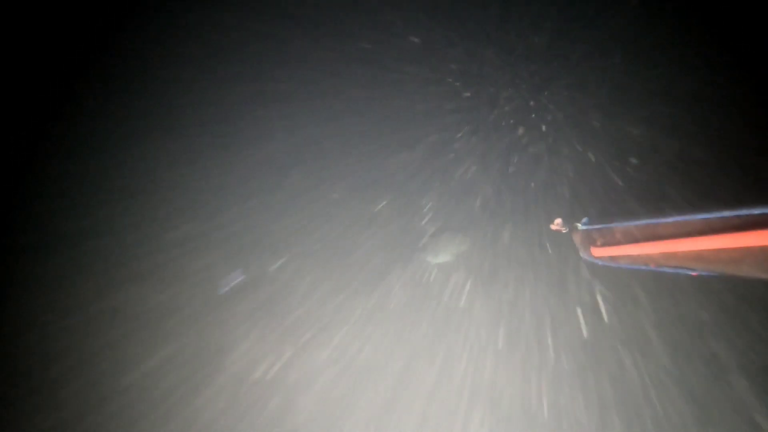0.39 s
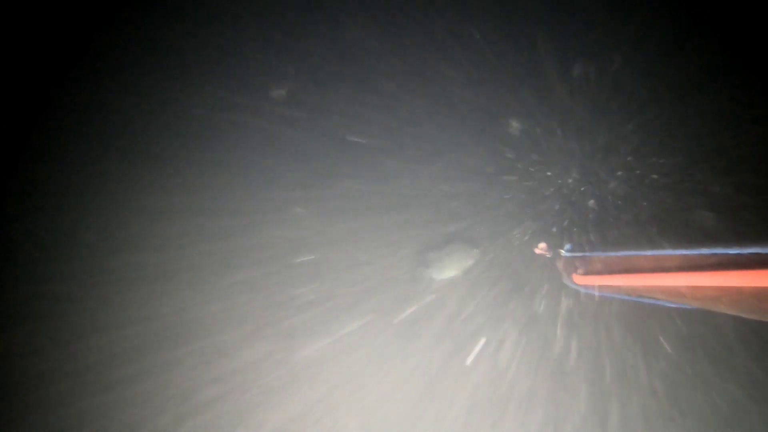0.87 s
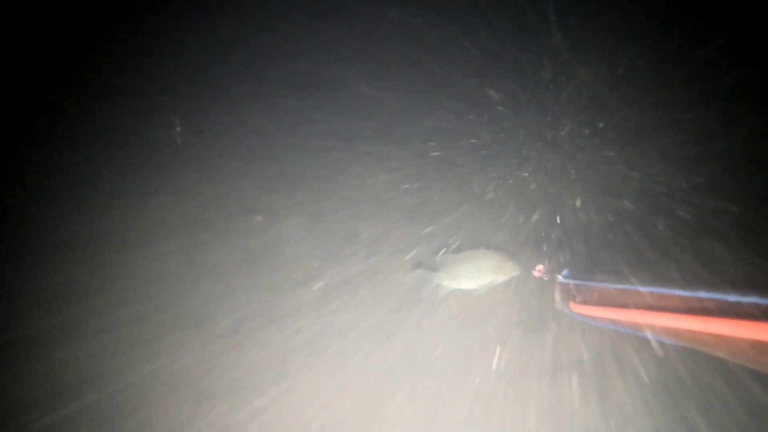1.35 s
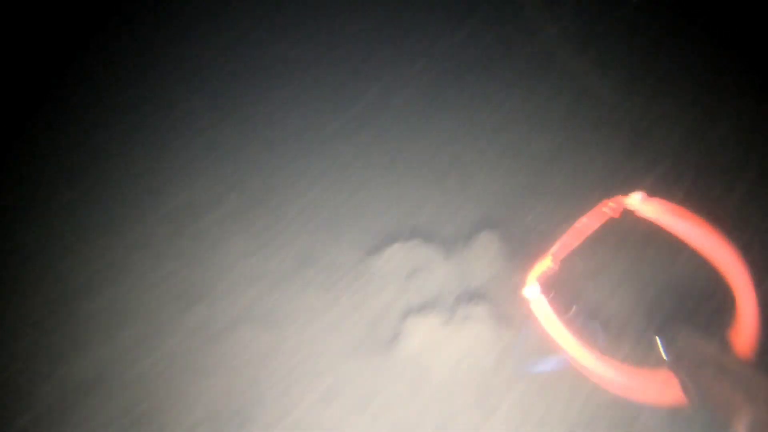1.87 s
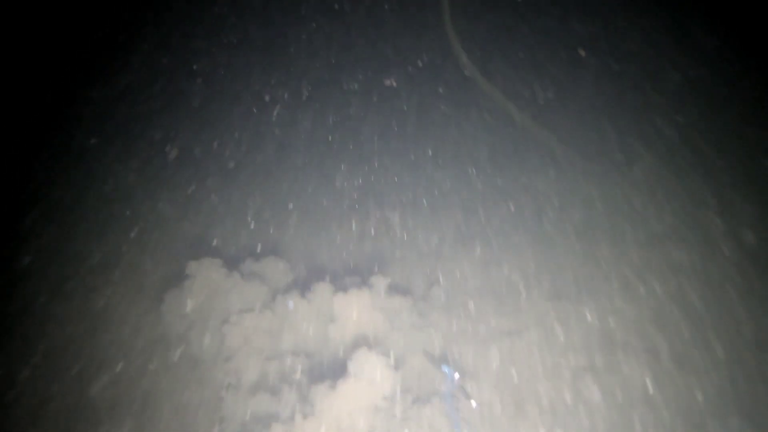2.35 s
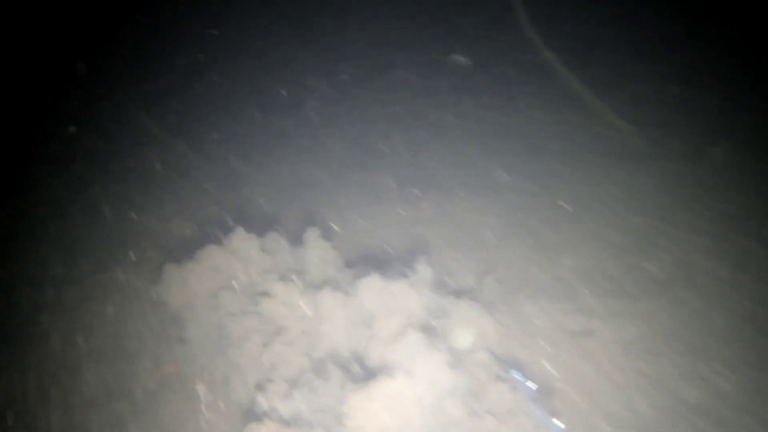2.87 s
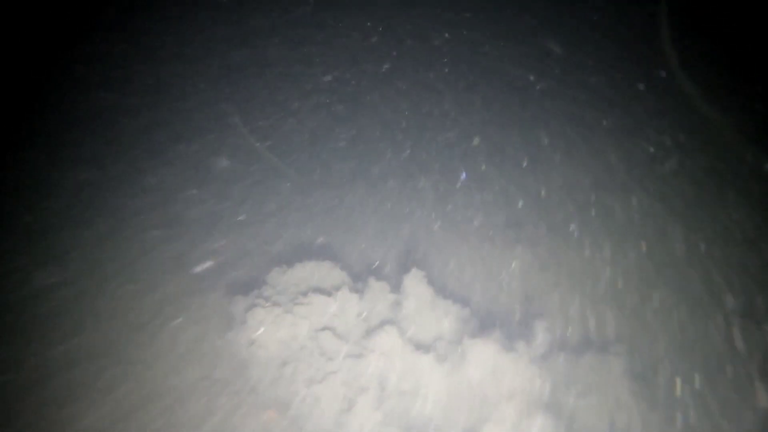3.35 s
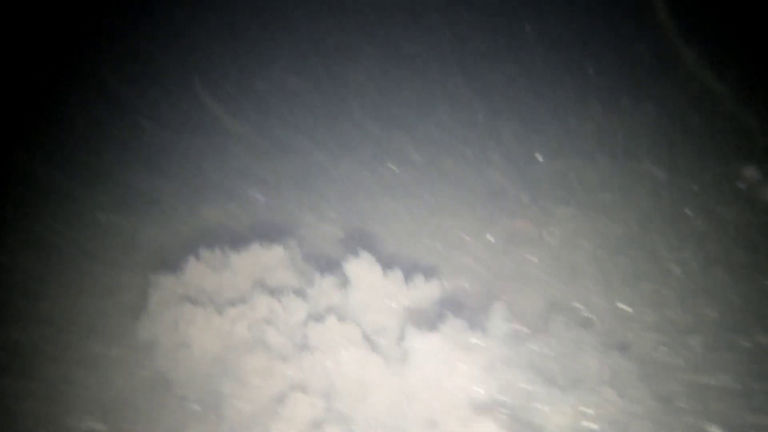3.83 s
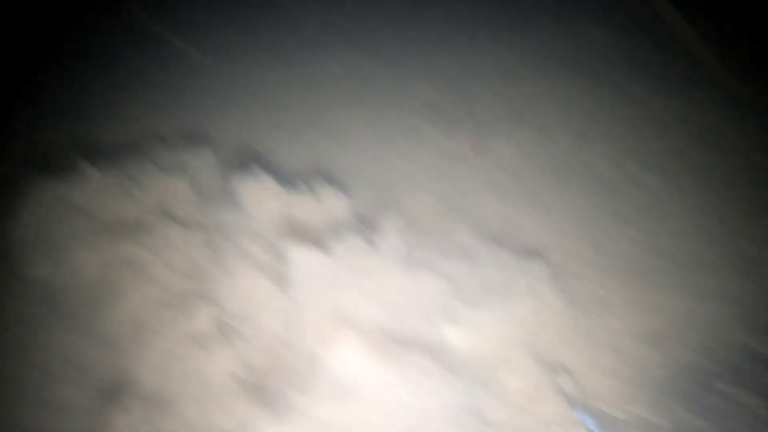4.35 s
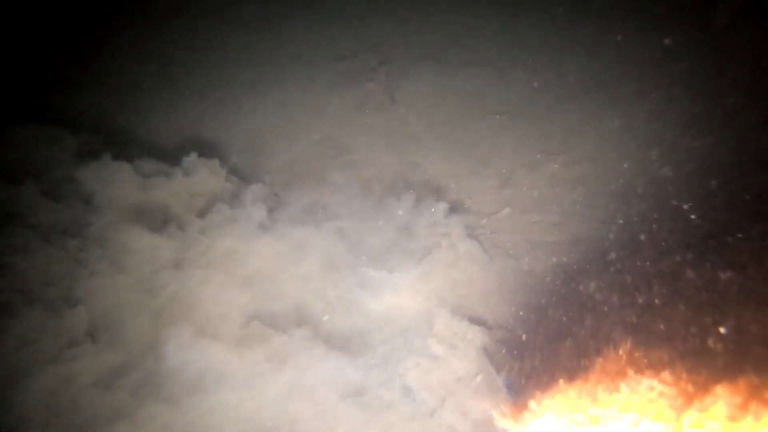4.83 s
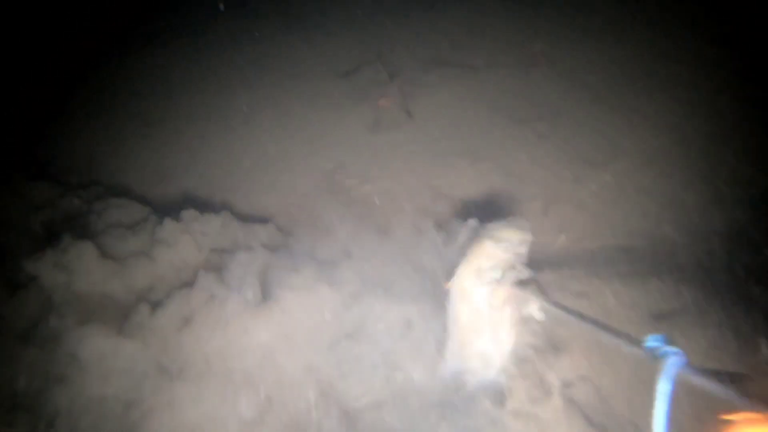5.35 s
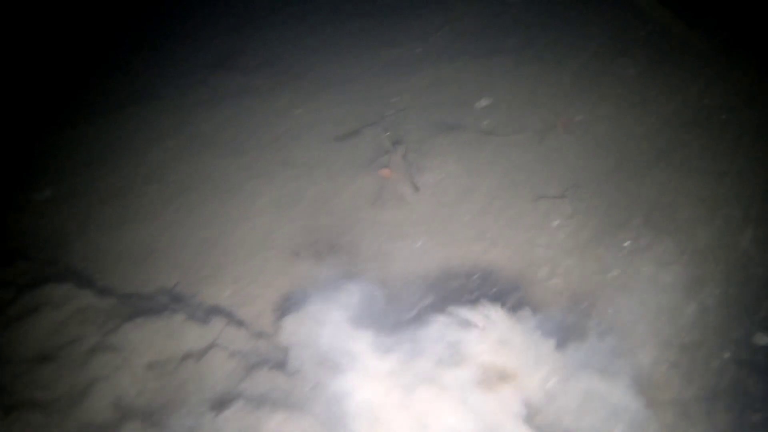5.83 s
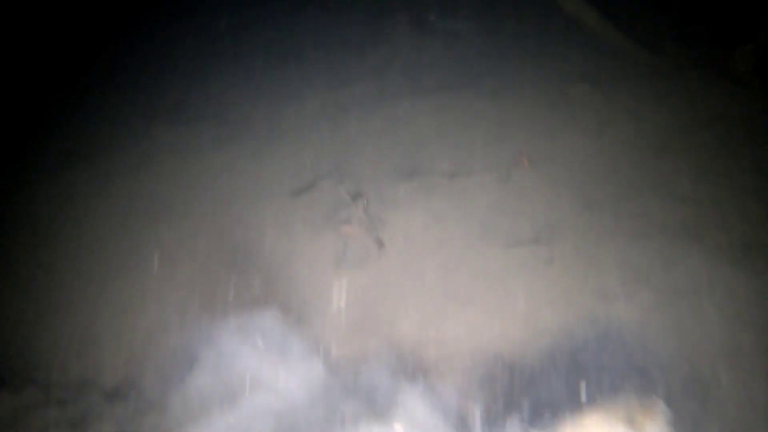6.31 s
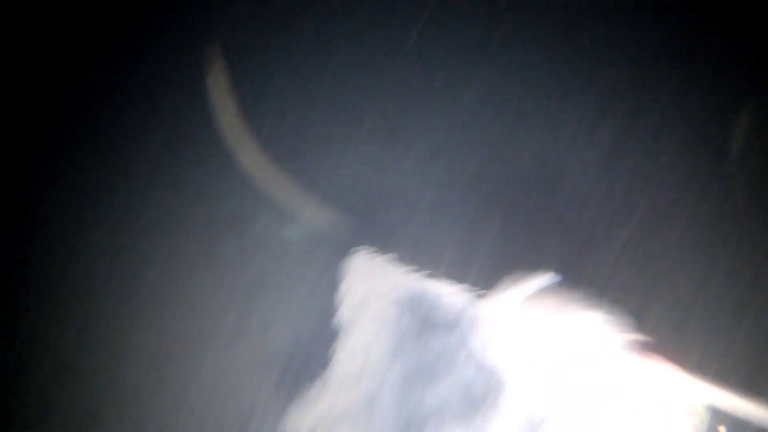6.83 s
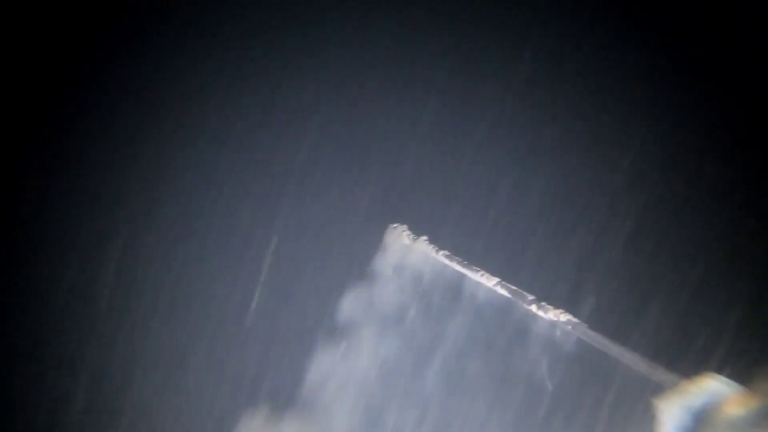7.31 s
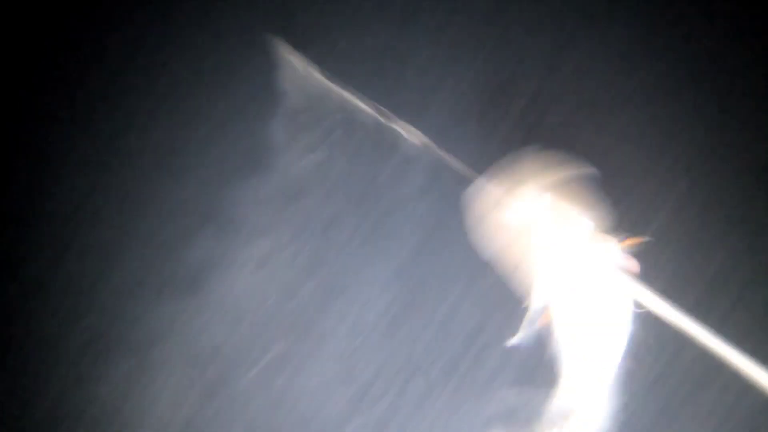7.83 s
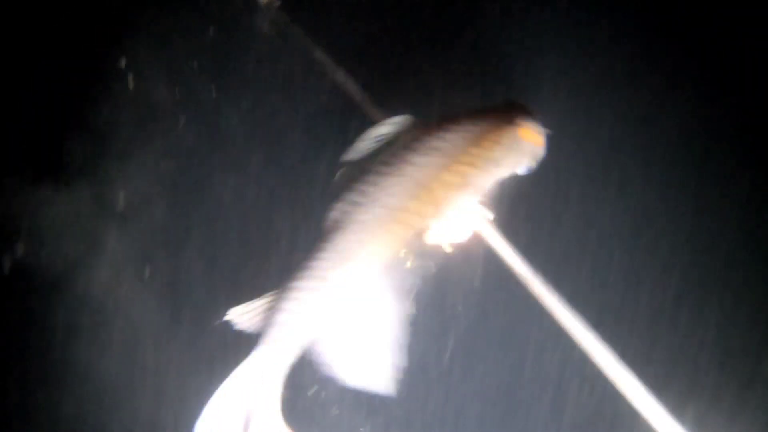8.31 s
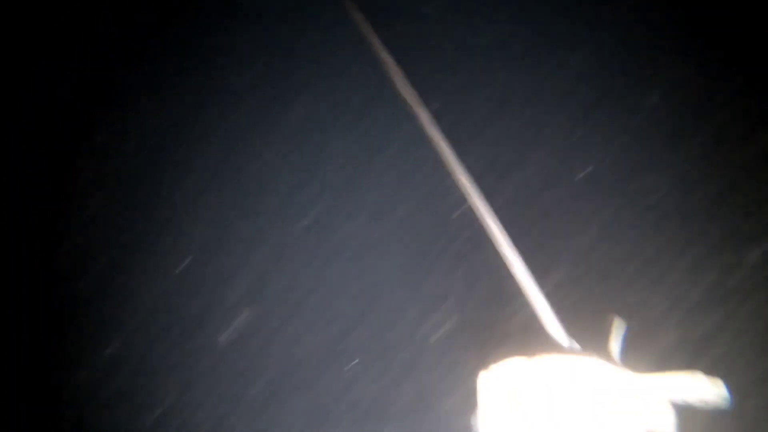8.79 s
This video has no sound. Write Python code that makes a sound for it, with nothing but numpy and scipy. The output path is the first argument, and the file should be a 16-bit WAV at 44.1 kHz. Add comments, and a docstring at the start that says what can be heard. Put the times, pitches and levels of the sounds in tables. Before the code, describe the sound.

Underwater sound picked up inside a hard plastic camera housing, muffled, close and boxy. For the first second there is low water rumble, faint rubbing, a short deep hum and small ticks. At about 1.1 s a speargun fires: a loud clipped crack and thump, a brief tearing rasp, rough steel ring and low barrel resonance dying quickly. From 1.3 to 3.7 s, dry clicks and light hollow knocks are scattered over quiet crackle, with a few tiny bubble blips. Around 4.0 s two stronger hollow knocks and brief low hums sound. From 4.6 to 5.5 s come dense muffled thumps, scraping and hissing grit. More bumps fall near 6.4 s, a sharp clack at 7.1 s, and a thud at 7.4 s. Deep drags and bumps surge around 8.0 to 8.4 s, then from 8.6 s loud, plopping, gurgling bubbles crowd in with a splashy hiss until the end.

```python
"""A speargun fires under water beside a camera in a hard plastic housing; line, spear and fish are hauled in.
Ticks, thumps, rubbing and the tearing of spear and bands excite the resonant modes of the housing. Gun barrel
and steel shaft add decaying modes, further knocks ring a common set near 630 Hz; dragging adds held deep hums.
Moving water rocks the housing in narrow bands of deep noise, and bubbles ring as sliding sines, a few at first,
then thickly near the end."""
import sys
import numpy as np
from scipy import signal
from scipy.fft import next_fast_len
from scipy.io import wavfile

SR = 44100
rng = np.random.default_rng(int(sys.argv[2]) if len(sys.argv) > 2 else 0)


def makeup_ratio(level_db):
    """Linear amplitude ratio for a level in decibels (20 dB per factor of ten)."""
    decades = np.asarray(level_db, float) / 20
    return 10 ** decades


def output_pcm(signal):
    """Save a mono or channel-first signal as 16-bit PCM at the path in sys.argv[1].

    Samples are clipped to [-1, 1] before scaling.
    """
    pcm = np.clip(np.atleast_2d(signal).T, -1, 1) * 32767
    wavfile.write(sys.argv[1], SR, np.round(pcm).astype(np.int16))


N = 393813


def level(x, db):
    """Normalization: scale a signal to a given rms level."""
    return x * makeup_ratio(db) / np.sqrt(np.mean(x ** 2))


def curves(table):
    """Linear interpolation: join each column after the time by straight lines, one value a sample."""
    s, *columns = np.transpose(table)
    return [np.interp(np.arange(N) / SR, s, column) for column in columns]


def ring(x, hz, t60):
    """Damped resonance: a complex one-pole filter turns x into a decaying rotating pointer."""
    pole = np.exp((2j * np.pi * hz - np.log(1000) / t60) / SR)
    return signal.lfilter([1], [1, -pole], x)


def band(hz, width_hz):
    """Narrow-band noise: filtered white noise of rms 1, made a rotating pointer by the Hilbert transform."""
    edges_hz = [hz - width_hz / 2, hz + width_hz / 2]
    sos = signal.butter(2, edges_hz, "bandpass", fs=SR, output="sos")
    noise = level(signal.sosfilt(sos, rng.standard_normal(N)), 0)
    return signal.hilbert(noise, next_fast_len(N))[:N]


def spikes(s, gain, push_ms):
    """Impulsive excitation: blows at times s, where a softer contact pushes longer."""
    x = np.zeros(N)
    np.add.at(x, np.clip((np.asarray(s) * SR).astype(int), 0, N - 1), gain)
    push = np.hanning(max(int(push_ms * SR / 1000), 1) + 2)
    return np.convolve(x, push / push.sum())[:N]


def grit(per_s, spread_db, hiss):
    """Granular noise: random clicks, a few much larger than the rest, over a smooth hiss; rms 1."""
    size = makeup_ratio(spread_db * np.minimum(rng.exponential(size=N), 4))
    size = size * (rng.random(N) < per_s / SR)
    clicks = level(size * rng.standard_normal(N), 0)
    return level(clicks + hiss * rng.standard_normal(N), 0)


def chatter(x, tail_ms, tail_db):
    """Repeated micro-impacts: loose parts add an exponentially fading noise after each blow."""
    fade = signal.lfilter([1], [1, -np.exp(-1000 / (tail_ms * SR))], x)
    return x + makeup_ratio(tail_db) * fade * rng.standard_normal(N)


def burst(s, rise_s, hold_s, t60):
    """Attack and exponential decay: a gain that swells from s, holds, then dies away."""
    t = np.arange(N) / SR - s
    return np.clip(t / rise_s, 0, 1) * makeup_ratio(-60 * np.maximum(t - rise_s - hold_s, 0) / t60)


def gusts(per_s, spread_db):
    """Random modulation: a factor that wanders between random decibel values."""
    count = int(N / SR * per_s) + 2
    return makeup_ratio(spread_db * np.interp(np.arange(N) / SR * per_s, np.arange(count), rng.standard_normal(count)))


def lean(z, hz):
    """Level and phase differences: a vibration of this pitch as the left and right microphones feel it."""
    # how left differs from right: (frequency [Hz], louder [dB], earlier [rad])
    sides = [(30, 6, 0.27), (92.1, 3.5, 0.29), (205, -1, 0.85), (630, 6.5, 1.78), (1060, -11.5, 2),
             (1800, -4, 0.73), (2850, 4, 0.12), (5430, 1, 0.81), (12300, 16.5, 1.2)]
    f, db, lead = np.transpose(sides)
    # each side takes half the difference, with opposite signs
    half = np.array([[1], [-1]]) / 2
    db = np.interp(np.log(hz), np.log(f), db) * half
    lead = np.interp(np.log(hz), np.log(f), lead) * half
    return (makeup_ratio(db) * np.exp(1j * lead) * z).imag


def water():
    """Low-frequency flow excitation: housing sways near one deep pitch, eddies wallow above, shoves swell both."""
    sway_hz, wallow_hz = 29.77, 72
    # steady motion: (time [s], sway level [dB], wallow level [dB])
    motion = [(0.0, -37, -59.5), (0.3, -42.5, -42.5), (0.9, -45, -72.5), (1.3, -40, -52), (1.6, -36, -71),
              (3.2, -38.5, -53), (3.73, -37, -32), (3.85, -28, -81), (4.05, -29.5, -40), (4.3, -34.5, -59),
              (4.9, -33.5, -30.5), (5.32, -38.5, -50.5), (5.6, -30.5, -45), (6.89, -37, -37),
              (7.54, -28.5, -37.5), (7.95, -39, -55.5), (8.32, -36, -35), (8.68, -28.5, -35),
              (8.93, -39.5, -27.5)]
    # hard shoves that set the water surging: (time [s], sway level [dB], wallow level [dB])
    surges = [(1.081, -36.5, -14), (5.468, -39, -21.5), (8.04, -20, -19.5)]
    sway, wallow = makeup_ratio(np.array(curves(motion)))
    for s, sway_db, wallow_db in surges:
        swell = burst(s, rise_s=0.0046, hold_s=0, t60=0.19)
        sway = sway + makeup_ratio(sway_db) * swell
        wallow = wallow + makeup_ratio(wallow_db) * swell
    swaying = sway * lean(band(sway_hz, width_hz=8.96), sway_hz)
    return swaying + wallow * lean(band(wallow_hz, width_hz=40), wallow_hz)


def hums():
    """Friction-driven vibration: the largest panel holds a slightly wavering deep tone during each drag."""
    # drags: (time [s], level [dB], frequency [Hz], hold [s])
    drags = [(0.206, -38, 186, 0.12), (1.248, -33.5, 92.7, 0.023), (4.042, -32.5, 195.6, 0.026),
             (4.128, -31, 205, 0.068), (4.268, -38.5, 199, 0.026), (8.048, -23, 196, 0.016),
             (8.054, -15.5, 72, 0.011), (8.353, -20.5, 197, 0.037)]
    out = np.zeros((2, N))
    for s, db, hz, hold in drags:
        gain = makeup_ratio(db) * burst(s, rise_s=0.017, hold_s=hold, t60=0.18) * gusts(per_s=65, spread_db=2.0)
        # here the wandering factor bends the pitch
        phase = 2 * np.pi * np.cumsum(hz * gusts(per_s=37, spread_db=0.64)) / SR
        out += lean(gain * np.exp(1j * phase), hz)
    return out


def bubbles():
    """Bubble resonance: each is a decaying, wavering sine of sliding pitch; tiny ones come in clouds."""
    # single bubbles: (time [s], level [dB], starting frequency [Hz], t60 [s])
    singles = [(1.66, -37.5, 3100, 0.055), (2.772, -41, 1810, 0.036), (2.812, -39, 1800, 0.041),
               (2.848, -40.5, 1520, 0.03), (3.619, -35.5, 1780, 0.022), (3.806, -38.5, 1470, 0.046),
               (3.846, -32, 1750, 0.018), (7.011, -32, 1444, 0.15), (8.614, -24.5, 2100, 0.035),
               (8.62, -20.5, 904, 0.14), (8.627, -19, 2850, 0.013), (8.636, -15, 1340, 0.033),
               (8.642, -12.5, 444, 0.19), (8.645, -7.5, 810, 0.095), (8.673, -14.5, 2764, 0.019),
               (8.688, -7.5, 1310, 0.019), (8.692, -11, 733, 0.18), (8.716, -14, 1875, 0.046),
               (8.738, -25, 1800, 0.029), (8.738, -14, 822, 0.2), (8.755, -13.5, 860, 0.053),
               (8.773, -20, 1815, 0.028), (8.799, -2.5, 600, 0.17), (8.812, -31, 2000, 0.03),
               (8.812, -30, 3030, 0.015), (8.84, -33, 2020, 0.032), (8.856, -10, 858, 0.11),
               (8.857, -39, 2980, 0.013), (8.886, -33, 3240, 0.016)]
    # clouds of tiny bubbles: (start [s], end [s], loudest level [dB])
    clouds = [(6.845, 7.102, -36.5), (8.417, 8.592, -31), (8.61, 8.928, -16.5)]
    per_s, lowest_hz = 500, 600  # of the clouds
    still_hz, slide_octaves = 950, 0.2  # lower bubbles slide up, higher ones down, per octave away
    swarm = []
    for start, end, top_db in clouds:
        for when, faint, small in rng.random((int(per_s * (end - start)), 3)):
            # smaller bubbles are higher, fainter and shorter
            swarm.append((start + when * (end - start), top_db - 12 * faint - 14 * small,
                          lowest_hz * 2 ** (2.6 * small), 0.035 * 2 ** (-2.5 * small)))
    out, t = np.zeros((2, N + SR)), np.arange(SR // 3) / SR
    for s, db, hz, t60 in [*singles, *swarm]:
        rise_ms = 0.5 * 2 ** (-db / 29)  # 29 dB fainter starts twice as slowly
        # the slide eases off, and neighbours jostle the pitch
        octaves = slide_octaves * np.log2(still_hz / hz) * (1 - np.exp(-t / 0.039))
        octaves = octaves + 0.03 * np.interp(t * 150, np.arange(64), rng.standard_normal(64))
        phase = 2 * np.pi * np.cumsum(hz * 2 ** octaves) / SR
        waver_db = 3 * np.interp(t * 180, np.arange(64), rng.standard_normal(64))
        fade = makeup_ratio(db + waver_db - 60 * (t / t60) ** 1.55) * (1 - np.exp(-1000 * t / rise_ms))
        first = int(s * SR)
        out[:, first:first + len(t)] += lean(fade * np.exp(1j * phase), hz)
    return out[:, :N]


def knocks():
    """Modal excitation: further knocks, each rattling briefly and ringing a common set of modes in its own mix."""
    # modes rung by the further knocks: (frequency [Hz], level [dB], t60 [s])
    modes = [(634.5, 0, 0.067), (714, -13, 0.077), (870, -12.5, 0.09)]
    # the knocks: (time [s], level [dB])
    strikes = [(1.315, -36), (1.335, -30.5), (2.302, -35.5), (2.316, -28.5), (2.415, -43), (2.433, -32),
               (2.467, -32.5), (2.513, -47), (2.583, -30), (2.866, -40), (2.885, -39.5), (3.619, -33.5),
               (4.009, -11), (4.042, -12.5), (4.137, -29.5)]
    s, db = np.transpose(strikes)
    share = makeup_ratio(2 * rng.standard_normal((len(s), len(modes))))
    body = np.zeros((2, N))
    for k, (hz, mode_db, t60) in enumerate(modes):
        blows = chatter(spikes(s, makeup_ratio(db) * share[:, k], push_ms=0.55), tail_ms=6.1, tail_db=-20)
        body += makeup_ratio(mode_db) * lean(ring(blows, hz, t60), hz)
    return signal.sosfilt(signal.butter(2, 450, "highpass", fs=SR, output="sos"), body)


def rushes():
    """Granular noise: dense, hissing grit swells over door and latch, the last a splash among the bubbles."""
    # swells, before the zone offsets: (time [s], level [dB], swell [s], hold [s])
    swells = [(4.646, -70, 0.13, 0.089), (5.334, -74, 0.17, 0.3), (7.71, -83.5, 0.068, 0.42),
              (8.592, -75.5, .03, 0.16)]
    gain = sum(makeup_ratio(db) * burst(s, swell, hold, t60=0.61) for s, db, swell, hold in swells)
    return gain * gusts(per_s=25, spread_db=2.5) * grit(per_s=1000, spread_db=3.5, hiss=0.6)


def rubbing():
    """Frictional excitation: scraping drives panels and walls; crackle and rushes drive door, latch and clips."""
    # rubbing and flow, before the zone offsets:
    # (time [s], largest panel level [dB], walls level [dB], door, latch and clips level [dB])
    strength = [(0.0, -49.5, -73.5, -53.5), (0.84, -53, -68.5, -61), (1.07, -56, -86, -49),
                (1.19, -45.5, -57.5, -66.5), (1.49, -71, -70.5, -67.5), (1.94, -71.5, -67.5, -51),
                (2.81, -57.5, -71, -60), (3.95, -55.5, -66, -56.5), (4.15, -45.5, -45.5, -44.5),
                (4.33, -53, -68.5, -68), (4.87, -35.5, -39, -46), (5.25, -43, -50, -60),
                (5.65, -44, -45, -54.5), (6.1, -44.5, -58, -60), (7.0, -35, -53, -56),
                (7.65, -46.5, -59, -68), (8.0, -36.5, -41, -54.5), (8.32, -44, -56, -63),
                (8.45, -36.5, -51, -54.5), (8.93, -25, -36.5, -62.5)]
    deep_db, walls_db, door_db = curves(strength)
    scrape = gusts(per_s=25, spread_db=4) * grit(per_s=200, spread_db=2.5, hiss=0.4)
    snaps = gusts(per_s=6, spread_db=3) * grit(per_s=75, spread_db=2.5, hiss=0)
    fizz = 0.7 * gusts(per_s=9, spread_db=4) * rng.standard_normal(N)
    rub = [makeup_ratio(deep_db - 22.5) * scrape, makeup_ratio(walls_db - 25.0) * scrape]
    rush = rushes()
    for offset_db, rush_db in [(-22, 3.0), (-23.0, 0), (-36.5, -19.5)]:  # door, latch, clips
        # each snap reaches each zone with its own strength
        uneven = snaps * makeup_ratio(5 * rng.standard_normal(N))
        crackle = level(chatter(uneven, tail_ms=7, tail_db=-19) + fizz, 0)
        rub.append(makeup_ratio(door_db + offset_db) * crackle + makeup_ratio(rush_db) * rush)
    return rub


def tearing():
    """Stick-slip excitation: spear and bands tear along the barrel in short bursts of grit."""
    # bursts, before the zone offsets: (time [s], level [dB], hold [s])
    tears = [(1.071, -19.5, 0.03), (1.105, -14, 0.0021), (1.132, -19.5, 0.019)]
    gain = sum(makeup_ratio(db) * burst(s, rise_s=0.0047, hold_s=hold, t60=0.036) for s, db, hold in tears)
    return gain * grit(per_s=900, spread_db=2.5, hiss=0.7)


def housing():
    """Modal superposition: each blow lands on another spot, so it rings each mode with its own strength."""
    # housing modes, t60 as when nothing touches it: (frequency [Hz], level [dB], t60 [s])
    modes = [(197.2, -1.5, 0.086), (280, 4, 0.083), (360.8, -2, 0.13), (465, -3.5, 0.081),
             (575.6, 8.5, 0.051), (627.6, 8.5, 0.072), (860, -2.5, 0.1), (900, -0.5, 0.0084),
             (1429, -3, 0.016), (1730, 5.5, 0.012), (1790, -12, 0.0053), (2737, 4.5, 0.0093),
             (2923, 4.5, 0.011), (3092, -2.5, 0.014), (3320, -12.5, 0.014), (3560, -11.5, 0.0044),
             (4930, 22.5, 0.00057), (5396, 1, 0.0037), (6460, 5.5, 0.0053), (7620, 14.5, 0.0011),
             (8700, 5, 0.0038), (10800, -6.5, 0.0042)]
    # upper limits [Hz] of deep panels, walls, door and latch; small clips lie above
    zone_tops_hz = [430, 1000, 2250, 4400]
    # hard ticks of buckles and line, before zone offsets:
    # (time [s], latch and clips level [dB], door level [dB])
    ticks = [(0.238, -28, -33.5), (0.54, -28, -31), (0.7767, -19.5, -21.5), (0.8958, -42, -43),
             (0.917, -29, -54), (0.9769, -28, -42), (1.0091, -18.5, -18), (1.0805, -8, -13),
             (1.084, -3.5, -8), (1.0879, -9.5, -1), (1.1089, -13.5, -6), (1.1364, -18, -22),
             (1.146, -13, -12), (1.16, -20, -39), (1.218, -34, -49), (1.248, -35.5, -46), (1.7247, -21, -6),
             (1.8852, -22, -38), (1.9178, -20.5, -67.5), (1.9989, -7, -11), (2.143, -28, -42),
             (2.1917, -17, -32), (2.3516, -20, -34.5), (2.4878, -29, -36), (2.5657, -24, -24),
             (2.7938, -27, -34), (3.056, -24.5, -33), (3.1395, -7.5, -12), (3.252, -31, -38),
             (3.5223, -22, -24.5), (3.7008, -39, -59), (3.883, -25.5, -23.5), (4.008, -32, -13.5),
             (4.0433, -16.5, -18), (4.136, -58, -24.5), (4.2107, -9.5, -20.5), (4.662, -24, -29),
             (4.6952, -29, -35), (4.7351, -11, -15.5), (4.8159, -17, -21.5), (4.9001, -23, -25),
             (4.935, -49, -26), (5.1012, -27, -27), (5.1517, -28, -40), (5.582, -27, -22.5),
             (5.591, -26.5, -33), (5.6443, -29.5, -32), (5.775, -33, -55), (5.8374, -28.5, -27.5),
             (5.938, -26.5, -33), (5.9499, -20, -24), (6.058, -26, -48), (6.143, -23, -28),
             (6.3137, -61, -25.5), (6.3632, -17.5, -24.5), (6.4968, -17, -29.5), (6.52, -13.5, -24),
             (6.7591, -14.5, -23), (6.978, -31.5, -31), (7.062, -26, -33), (7.1082, -2, -3.5),
             (7.2549, -28, -65.5), (7.409, -32, -40), (7.833, -30.5, -57), (8.024, -24, -56),
             (8.1153, -49, -31.5), (8.192, -35, -44), (8.3725, -27.5, -21), (8.5045, -28.5, -38),
             (8.6172, -26, -21), (8.6277, -33, -22), (8.6998, -25.5, -9), (8.8572, -18.5, -41.5)]
    # soft thumps of hand, fish and gun, before zone offsets:
    # (time [s], walls level [dB], deep panels level [dB])
    thumps = [(0.356, -30.5, -34), (1.087, -14, -2), (1.109, 0, -10), (1.15, -14.5, -25), (1.262, -36, -44),
              (1.305, -40, -31.5), (1.724, -16, -28.5), (1.999, -30, -47), (3.428, -55, -38),
              (3.14, -30.5, -60), (4.009, -32, -33), (4.041, -21.5, -23), (4.134, -40, -38),
              (4.647, -53, -22), (4.678, -23.5, -68), (4.734, -30, -22), (4.788, -24.5, -57),
              (4.87, -31, -16.5), (4.89, -19, -18), (4.912, -23, -17), (4.943, -22.5, -24),
              (4.964, -16.5, -5.5), (4.995, -34, -43), (5.055, -35, -23.5), (5.075, -17.5, -11.5),
              (5.093, -12.5, -53), (5.182, -16.5, -45), (5.206, -12, -5.5), (5.224, -27, -41),
              (5.335, -41, -25), (5.359, -17, -19.5), (5.378, -32, -20.5), (5.475, -14.5, -15),
              (5.492, -35, -19), (6.316, -12.5, -15), (6.387, -25, -36), (6.408, -5.5, -9.5),
              (6.435, -28, -15.5), (6.686, -36.5, -28), (7.108, -23.5, -27.5), (7.304, -26.5, -27),
              (7.33, -19.5, -20), (7.441, -7.5, -8.5), (8.048, -15, -12), (8.168, -20.5, -46),
              (8.178, -15, -36), (8.212, -27, -23), (8.358, -16.5, -37), (8.364, -18, -16),
              (8.374, -19.5, -18.5), (8.401, -22, -22.5), (8.44, -33, -28), (8.616, -32, -40)]
    tick, thump = np.array(ticks), np.array(thumps)
    deepest_hz = 230  # only the largest panel, below this, takes the deepest rubbing
    grip = 0.5  # a hand or body in contact shortens the struck ring of panels and walls to this share
    # one value per zone: deep panels, walls, door, latch, clips
    blow_db = [thump[:, 2] - 4, thump[:, 1] - 4, tick[:, 2] - 8, tick[:, 1] - 14, tick[:, 1] - 32]
    rattle_db = [-29.0, -51.5, -23.0, -36.0, -54.5]
    floors_hz = [110, 380, 800, 2000, 3800]
    roofs_hz = [900, 2000, 3600, 5200, 19000]
    rub, rattle = rubbing(), tearing()
    zones = np.searchsorted(zone_tops_hz, np.array(modes)[:, 0])
    share = makeup_ratio(2.2 * rng.standard_normal((len(tick) + len(thump), len(modes))))
    parts = np.zeros((len(rub), 2, N))
    for k, (hz, db, t60) in enumerate(modes):
        zone = zones[k]
        if zone < 2:
            blows = spikes(thump[:, 0], makeup_ratio(blow_db[zone]) * share[len(tick):, k], push_ms=1.4)
            blows = chatter(blows, tail_ms=12.2, tail_db=-32)
        else:
            blows = spikes(tick[:, 0], makeup_ratio(blow_db[zone]) * share[:len(tick), k], push_ms=0.05)
            blows = chatter(blows, tail_ms=6.8, tail_db=-23.5)
        struck = ring(blows + makeup_ratio(rattle_db[zone]) * rattle, hz, t60 * (grip if zone < 2 else 1))
        # the rubbing wanders over the surface, so each mode swells on its own
        wander = gusts(per_s=4, spread_db=3) * gusts(per_s=40, spread_db=3.5)
        rubbed = ring(wander * rub[max(zone, int(hz > deepest_hz))], hz, t60)
        parts[zone] += makeup_ratio(db) * lean(struck + rubbed, hz)
    # parts radiate little below and above their own pitches
    out = np.zeros((2, N))
    for floor_hz, roof_hz, part in zip(floors_hz, roofs_hz, parts):
        sos = signal.butter(2, [floor_hz, roof_hz], "bandpass", fs=SR, output="sos")
        out += signal.sosfilt(sos, part)
    return out


def barrel():
    """Modal excitation: the jolts of the shot, bands slapping home and recoil, ring the gun body."""
    # barrel modes: (frequency [Hz], level [dB], t60 [s])
    modes = [(83, -6.5, 0.38), (150.8, 2.5, 0.26), (378.3, 6.5, 0.06), (621.4, -5, 0.18), (815, 0, 0.1064)]
    # jolts: (time [s], upper modes level [dB], deep modes level [dB])
    jolts = [(1.084, -8.5, -19.5), (1.109, -13, -20), (1.124, -11.5, -10), (1.152, -22.5, -24),
             (1.173, -37, -33.5)]
    s, upper_db, deep_db = np.transpose(jolts)
    out = np.zeros(N)
    for hz, mode_db, t60 in modes:
        jolt_db = deep_db if hz < 200 else upper_db
        out += makeup_ratio(mode_db) * ring(spikes(s, makeup_ratio(jolt_db), push_ms=0.7), hz, t60).imag
    return out


def spear():
    """Modal impulse response: the steel shaft, struck during the shot, rings briefly and roughly."""
    # steel shaft modes: (frequency [Hz], level [dB], t60 [s])
    modes = [(3900, -9, 0.024), (5420, -16.5, .035)]
    struck_s = 1.082  # the shaft is struck
    strike = chatter(spikes([struck_s], 0.84, push_ms=0), tail_ms=4, tail_db=-20.5)
    return sum(makeup_ratio(db) * ring(strike, hz, t60).imag for hz, db, t60 in modes)


def scene():
    """Linear superposition: all sources add at the two microphones."""
    return water() + hums() + bubbles() + knocks() + housing() + barrel() + spear()


def width():
    """Time-varying mid-side balance: the stereo width opens quickly, holds and closes slowly."""
    # moments when left and right come apart: (time [s], share [0-1], hold [s], closing [s])
    openings = [(1.208, 1., 0.96, 1.11), (3.563, 1., 0.39, 0.87), (6.265, 0.16, 0.026, 0.61),
                (7.343, 0.86, 0.78, 0.86)]
    t = np.arange(N) / SR
    wide = np.full(N, 0.016)  # nearly mono at rest
    for s, share, hold, closing in openings:
        opening = 1 - np.exp(-np.maximum(t - s, 0) / 0.11)
        wide += share * opening * np.clip(1 - (t - s - hold) / closing, 0, 1)
    return np.clip(wide, 0, 1)


def roll_off(x):
    """The treble ends steeply here."""
    return signal.sosfilt(signal.butter(12, 15800, fs=SR, output="sos"), x)


def record(dry):
    """Low-pass transmission, mid-side mixing and clipping: ports, microphone fades and converter in turn."""
    # the sealed ports dull the top
    dulled = signal.sosfilt(signal.butter(2, 10100, fs=SR, output="sos"), dry)
    # the camera fades between summed and separate microphones
    mid = dulled.mean(axis=0)
    wide = mid + width() * (dulled - mid)
    # the converter clips the shot
    clipped = np.clip(wide, -1, 1)
    return roll_off(clipped)


dry = scene()
out = record(dry)
output_pcm(out)
```